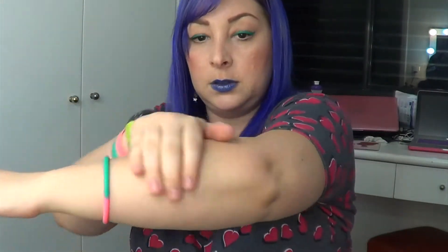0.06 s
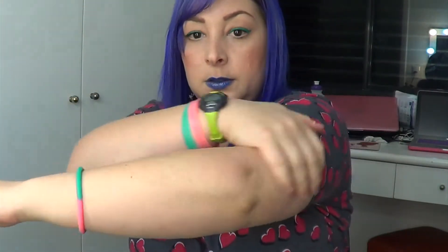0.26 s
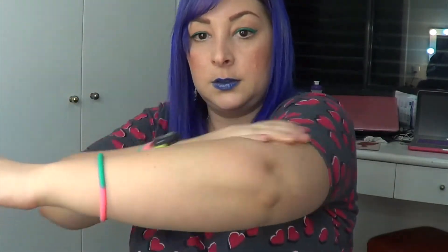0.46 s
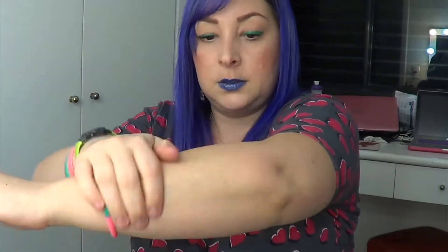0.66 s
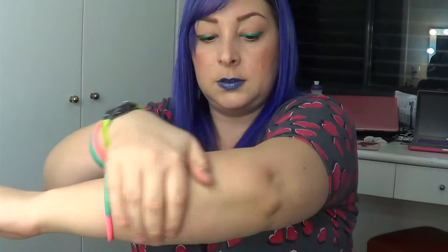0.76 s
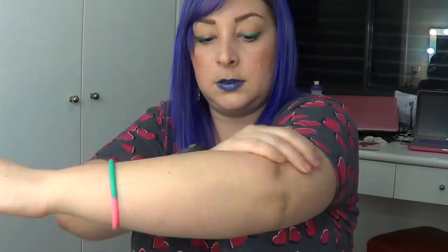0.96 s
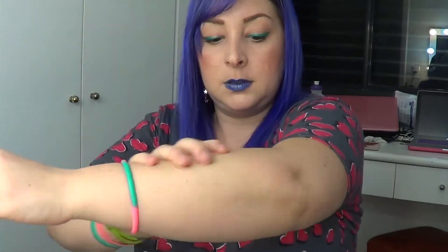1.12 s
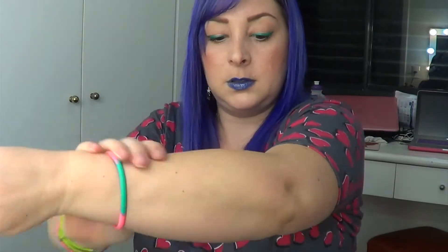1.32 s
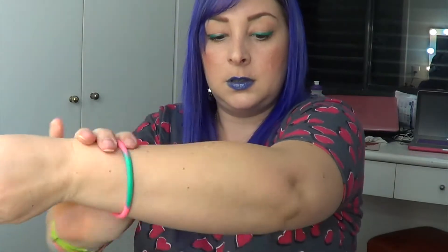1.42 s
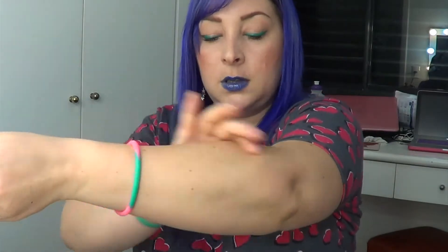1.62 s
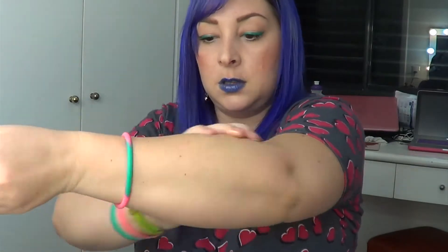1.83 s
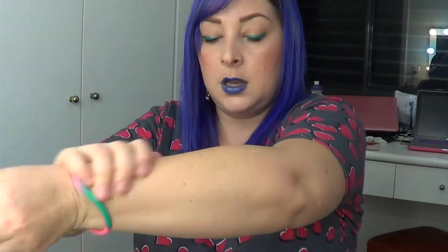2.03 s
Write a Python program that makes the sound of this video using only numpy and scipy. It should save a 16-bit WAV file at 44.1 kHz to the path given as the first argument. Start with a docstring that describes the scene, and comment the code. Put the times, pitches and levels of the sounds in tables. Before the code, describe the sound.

Skin rubbing on skin with cream: seven quick, airy, hissing strokes in a quiet room

```python
"""A palm rubs cream along a bare forearm in seven hissing strokes, after the fading tail of one more.
Hiss and a duller rub: dense random slips over noise, coloured by skin and swelling with each stroke.
The cream smacks in one quick run, the skin catches in short bright chirrs, something touched rings faintly.
Behind: a short room tail, a swell of rumble, room noise, hum and a thin electrical whine."""
import sys
import numpy as np
from scipy import signal
from scipy.fft import rfft, irfft, next_fast_len
from scipy.io import wavfile
from scipy.ndimage import uniform_filter1d, map_coordinates

SR = 44100
rng = np.random.default_rng(int(sys.argv[2]) if len(sys.argv) > 2 else 0)


def dump(signal):
    """Clip the signal to [-1, 1] and save it as 16-bit WAV at the path in sys.argv[1]."""
    limited = np.clip(np.atleast_2d(signal).T, -1, 1)
    pcm = np.round(limited * 32767).astype(np.int16)
    wavfile.write(sys.argv[1], SR, pcm)


N = 91728
t = np.arange(N) / SR

# hand pressure and speed, one list per stroke, before trim: t/s, hiss level/dB, rub level/dB
STROKE_LEVELS = [
    [(0, -45, -64), (.02, -47, -66), (.06, -58.5, -67)],
    [(.09, -48, -59), (.14, -39, -52), (.235, -39, -47), (.265, -34, -49), (.315, -34, -40),
     (.34, -35, -43.5), (.375, -40.5, -48)],
    [(.445, -48.5, -52.5), (.485, -48.5, -53.5), (.52, -37.5, -47.5), (.578, -36, -46.5), (.6, -32.5, -47),
     (.64, -34, -48), (.685, -34, -47.5), (.73, -42.5, -49)],
    [(.775, -51, -60), (.82, -44, -54), (.88, -33.5, -45), (.925, -31, -42), (.975, -40, -43.5)],
    [(1.04, -50.5, -53), (1.115, -34, -47.5), (1.18, -38, -52.5), (1.24, -41.5, -54), (1.315, -60, -63)],
    [(1.375, -53, -56), (1.4, -38.5, -50), (1.44, -42, -51), (1.485, -50, -51.5), (1.515, -65, -63)],
    [(1.595, -57, -56), (1.65, -41.5, -55), (1.7, -40, -54.5), (1.74, -40, -46.5), (1.775, -52, -57)],
    [(1.835, -65, -63), (1.88, -51.5, -57), (1.95, -40.5, -48), (2, -43, -47.5), (2.055, -49.5, -50.5)],
]
HISS_TRIM_DB, RUB_TRIM_DB = 0.5, -1
# hand posture: t/s, hiss gain in the top band/dB, lean/dB (added left, taken off right)
HAND_GRIP = [(0, 4, 1), (.15, -0.5, 0.4), (.26, 0, -0.5), (.35, -1, -0.5), (.62, -0.7, 0), (.92, -0.5, 0),
             (1.15, -1.5, -0.3), (1.42, -3, 2), (1.7, 3, 0.2), (1.96, 1.5, 0.9)]
BRIGHT_ABOVE_HZ = 9100
# hiss of skin under the hand, relative density: f/Hz, level/dB per Hz
HISS_SPECTRUM = [(1500, -37), (2800, -22), (3500, -12.5), (4200, -4), (4600, -9), (5100, -2.5),
                 (5700, -5.5), (6450, -1.5), (6900, -1.5), (7500, 0), (8300, -3), (9500, -1.5), (10400, -2),
                 (11500, -6), (13300, -7.5), (15000, -12), (16000, -16.5)]
# dull rub of the flat hand, relative density: f/Hz, level/dB per Hz
RUB_SPECTRUM = [(300, -24), (900, -14), (1500, -10), (2000, -5), (2500, 0), (2800, -2.5), (3400, 2),
                (4100, -1.5), (4700, -2), (7000, -15), (14000, -22)]
# left-right likeness of the skin sounds: f/Hz, correlation (-1 to 1)
SKIN_LIKENESS = [(1000, 0.66), (3000, 0.99), (5000, 1), (7000, 0.93), (9000, 1)]
SLIPS_PER_S, SLIP_SPREAD_DB, SLIP_POWER_SHARE = 6000, 3, 0.29
HISS_PATCHY_DB, RUB_PATCHY_DB = 1.8, 2.5  # rms
JUDDER_DB, JUDDER_KNOTS_PER_S = 0.32, 70  # uneven grip of the skin

# cream letting go in tiny smacks: t/s, level/dB (before attack), T60/s
SMACK_RUN = [(1.385, -38, 0.014), (1.3871, -26.5, 0.013), (1.3874, -31.5, 0.015), (1.3910, -28, 0.02)]
# wet smack colour, relative: f/Hz, level/dB
SMACK_SPECTRUM = [(200, -18), (1200, -20), (2900, -20), (3700, -9), (4900, 5.5), (6200, -5), (7500, 5.5),
                  (8700, -11), (10500, 0), (13000, -11), (16000, -14)]
SMACK_ATTACK_S = 0.00023
# burst of a cream bubble, relative colour: f/Hz, level/dB
SNAP_SPECTRUM = [(1000, -35), (3000, -22), (4500, -7), (8000, -4), (10500, 4), (13000, -5), (16000, -5)]
SNAP_S, SNAP_DB, SNAP_T60_S, SNAP_ATTACK_S = 1.3873, -22, 0.0035, 0.0001

# skin catching in chirrs: centre t/s, level/dB, Gaussian sigma/s
SKIN_CATCHES = [(0.593, -32.5, .007), (1.74, -52, .008), (2.071, -43, 0.00356)]
# resonances of a catch: f/Hz, width/Hz, relative level/dB
CATCH_RESONANCES = [(7650, 250, -0.5), (10250, 450, -3.5)]

# something touched, ringing faintly
TINK_S, TINK_HZ, TINK_DB, TINK_T60_S, TINK_ATTACK_S = 1.559, 1410, -52, 0.19, 0.0023
TINK_PHASE_RAD, TINK_KNOTS_PER_S = 0.45, 97

# decay of the room: f/Hz, T60/s
ROOM_DECAY = [(300, .35), (3000, 0.35), (12000, .2)]
ROOM_DB = -33.5
# low rumble, relative density: f/Hz, level/dB per Hz
RUMBLE_SPECTRUM = [(15, -14), (35, -3), (60, 0), (100, -2), (200, -16), (600, -40), (3000, -100)]
RUMBLE_S, RUMBLE_SIGMA_S, RUMBLE_DB = 0.52, 0.22, -66.5
# room noise, relative density: f/Hz, level/dB per Hz
AIR_SPECTRUM = [(20, -21), (40, -9), (62, 1), (90, -1.5), (150, 0), (250, -0.5), (400, -1.5), (700, -3),
                (1300, -6.5), (2000, -9.5), (4000, -12), (8000, -12.5), (16000, -22.5)]
# left-right likeness of room noise and rumble: f/Hz, correlation (-1 to 1)
AIR_LIKENESS = [(50, .95), (120, 0.94), (250, 0.33), (550, -0.23), (1100, -0.33), (2200, 0.044),
                (6000, -0.012), (10000, 1)]
AIR_DB = -50.5
# hum lines and the high whine: f/Hz, rms level/dB
HUM_LINES = [(59.2, -76), (119, -71.5), (349.9, -66.5), (388.5, -70), (15735, -65)]
HUM_PHASE_RAD, HUM_KNOTS_PER_S = 0.32, 4.36
# stereo image narrowing in the top treble: f/Hz, side gain/dB
SIDE_GAIN = [(7500, 0), (8800, -11), (11000, -22), (12500, -28)]
TOP_HZ = 15830


def amp(db):
    """Decibels to gain."""
    return 10 ** (np.asarray(db) / 20)


def unit(x):
    """Scale to rms 1."""
    return x / np.sqrt(np.mean(x ** 2) + 1e-20)


def along(points, hz):
    """Read (Hz, value) points on a log-frequency axis."""
    f, v = np.transpose(points)
    return np.interp(np.log(hz + 1), np.log(f + 1), v)


def wobble(knots_per_s):
    """Smooth curve through random knots."""
    knots = rng.standard_normal(int(N * knots_per_s / SR) + 4)
    return map_coordinates(knots, [t * knots_per_s])


def noise_pair():
    """Two unrelated white noises."""
    return rng.standard_normal((2, N))


def filtered(x, response):
    """Apply a frequency response, zero-padded by at least half a second."""
    m = next_fast_len(N + SR // 2)
    gain = response(np.fft.rfftfreq(m, 1 / SR))
    return irfft(rfft(x, m) * gain, m)[..., :N]


def stereo(pair, spectrum, likeness):
    """Colour two unrelated signals and mix them to a set left-right correlation, rms 1."""
    def response(hz):
        angle = np.arccos(np.clip(along(likeness, hz), -1, 1)) / 2
        return amp(along(spectrum, hz)) * [np.cos(angle), np.sin(angle)]

    mid, side = filtered(pair, response)
    return unit(np.array([mid + side, mid - side]))


def struck(start_s, t60_s, attack_s):
    """Fast exponential rise at start_s, then exponential decay."""
    age = np.maximum(t - start_s, 0)
    return (1 - np.exp(-age / attack_s)) * np.exp(-np.log(1000) * age / t60_s)


def bump(centre_s, sigma_s):
    """Gaussian swell."""
    return np.exp(-0.5 * ((t - centre_s) / sigma_s) ** 2)


def rubbing():
    """Hiss and dull rub follow each stroke; grip sets the hiss brightness, judder the level."""
    s, hiss_db, rub_db = np.vstack(STROKE_LEVELS).T
    hiss_gain = amp(np.interp(t, s, hiss_db) + HISS_TRIM_DB)
    rub_gain = amp(np.interp(t, s, rub_db) + RUB_TRIM_DB)
    hiss = hiss_gain * stereo(slips(HISS_PATCHY_DB), HISS_SPECTRUM, SKIN_LIKENESS)
    rub = rub_gain * stereo(slips(RUB_PATCHY_DB), RUB_SPECTRUM, SKIN_LIKENESS)
    grip_s, bright_db, _ = np.transpose(HAND_GRIP)
    top = filtered(hiss, lambda hz: 1 - 1 / (1 + (hz / BRIGHT_ABOVE_HZ) ** 8))
    brightening = top * (amp(np.interp(t, grip_s, bright_db)) - 1)
    return (hiss + rub + brightening) * amp(JUDDER_DB * wobble(JUDDER_KNOTS_PER_S))


def slips(patchy_db):
    """Dense random skin slips over smooth noise, in randomly shifting colour."""
    sizes = amp(SLIP_SPREAD_DB * rng.standard_normal((2, N)))
    signs = np.sign(rng.standard_normal((2, N)))
    happens = rng.random((2, N)) < SLIPS_PER_S / SR
    grains = unit(sizes * signs * happens)
    mix = np.sqrt(SLIP_POWER_SHARE) * grains + np.sqrt(1 - SLIP_POWER_SHARE) * noise_pair()
    z = signal.stft(mix, nperseg=512)[2]
    # random gain per time-frequency cell, smoothed over frequency, then time
    field = uniform_filter1d(rng.standard_normal(z.shape[1:]), size=5, axis=0)
    field = uniform_filter1d(field, size=12, axis=1)
    return signal.istft(z * amp(patchy_db * unit(field)), nperseg=512)[1][:, :N]


def smacks():
    """The cream film parts: one sharp snap and short wet noise bursts."""
    envelope = sum(amp(db) * struck(s, t60, SMACK_ATTACK_S) for s, db, t60 in SMACK_RUN)
    wet = envelope * stereo(noise_pair(), SMACK_SPECTRUM, SKIN_LIKENESS)
    snap_envelope = amp(SNAP_DB) * struck(SNAP_S, SNAP_T60_S, SNAP_ATTACK_S)
    return wet + snap_envelope * stereo(noise_pair(), SNAP_SPECTRUM, SKIN_LIKENESS)


def catches():
    """Brief swells of friction noise through two narrow resonances."""
    def resonances(hz):
        return sum(amp(db) * (1j * hz * width / (f * f - hz * hz + 1j * hz * width))
                   for f, width, db in CATCH_RESONANCES)

    envelope = sum(amp(db) * bump(s, sigma) for s, db, sigma in SKIN_CATCHES)
    return envelope * unit(filtered(rng.standard_normal(N), resonances))


def tink():
    """One softly struck mode, its phase unsteady."""
    phase = TINK_PHASE_RAD * wobble(TINK_KNOTS_PER_S)
    ring = np.sin(2 * np.pi * TINK_HZ * t + phase)
    return amp(TINK_DB) * struck(TINK_S, TINK_T60_S, TINK_ATTACK_S) * ring


def room(x):
    """Diffuse tail: decaying noise, different at each ear, convolved with x."""
    hz, age, z = signal.stft(rng.standard_normal((2, SR // 2)), SR, nperseg=256)
    decay = np.exp(-np.log(1000) * age / along(ROOM_DECAY, hz)[:, None])
    tail = signal.istft(z * decay, SR, nperseg=256)[1]
    return signal.fftconvolve(x, tail / np.linalg.norm(tail[0]), axes=1)[:, :N]


def rumble():
    """Low noise that swells and fades once."""
    swell = bump(RUMBLE_S, RUMBLE_SIGMA_S)
    return amp(RUMBLE_DB) * swell * stereo(noise_pair(), RUMBLE_SPECTRUM, AIR_LIKENESS)


def hum():
    """Sines at the hum lines and the whine, phases drifting slightly."""
    total = np.zeros(N)
    for hz, db in HUM_LINES:
        drift = HUM_PHASE_RAD * wobble(HUM_KNOTS_PER_S)
        total += amp(db) * np.sqrt(2) * np.sin(2 * np.pi * (hz * t + rng.random()) + drift)
    return total


def room_noise():
    """Steady coloured noise, its stereo likeness varying with frequency."""
    return amp(AIR_DB) * stereo(noise_pair(), AIR_SPECTRUM, AIR_LIKENESS)


def scene():
    """The hand near the middle, leaning left and right; the room around it."""
    grip_s, _, lean_db = np.transpose(HAND_GRIP)
    lean = amp(np.outer([1, -1], np.interp(t, grip_s, lean_db)))
    hand = (rubbing() + smacks() + catches()) * lean
    return hand + amp(ROOM_DB) * room(hand) + tink() + rumble() + hum() + room_noise()


def record(dry):
    """The stereo image narrows to nearly mono in the top treble; nothing passes from TOP_HZ up."""
    mid = (dry[0] + dry[1]) / 2
    side = filtered((dry[0] - dry[1]) / 2, lambda hz: amp(along(SIDE_GAIN, hz)))
    return filtered(np.array([mid + side, mid - side]), lambda hz: hz < TOP_HZ)


dry = scene()
out = record(dry)
dump(out)
```